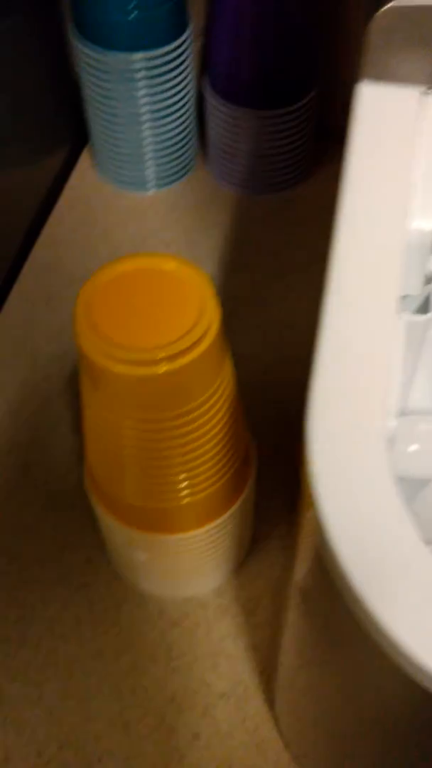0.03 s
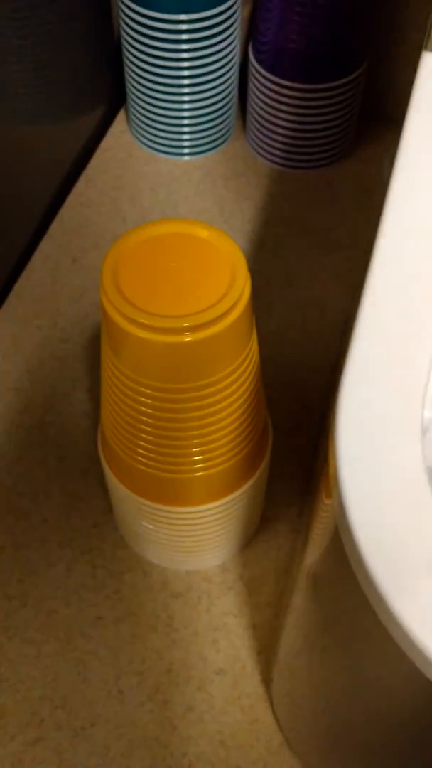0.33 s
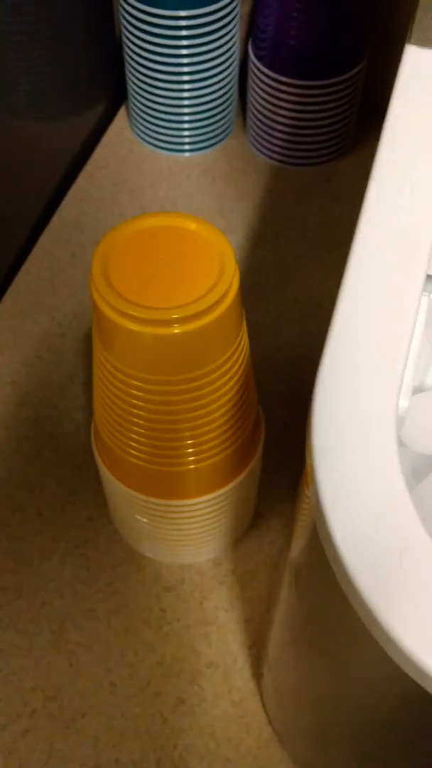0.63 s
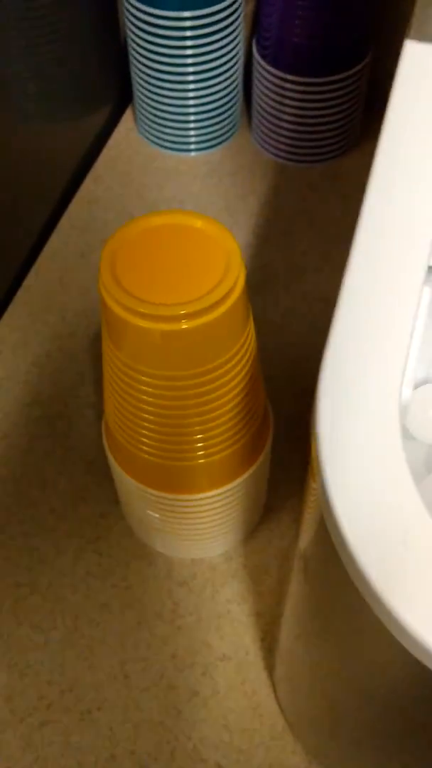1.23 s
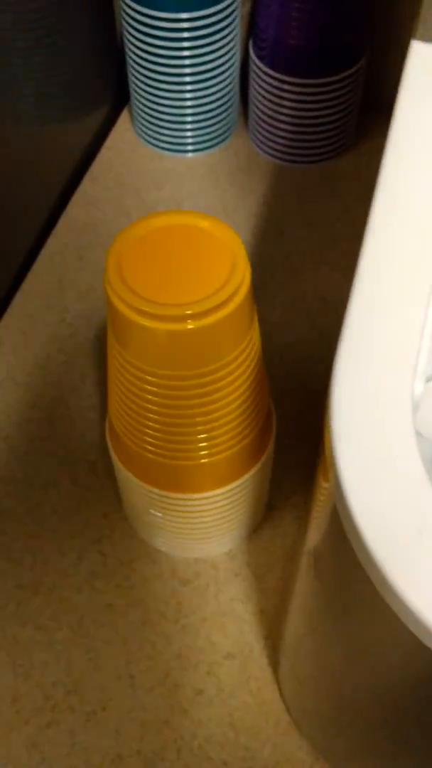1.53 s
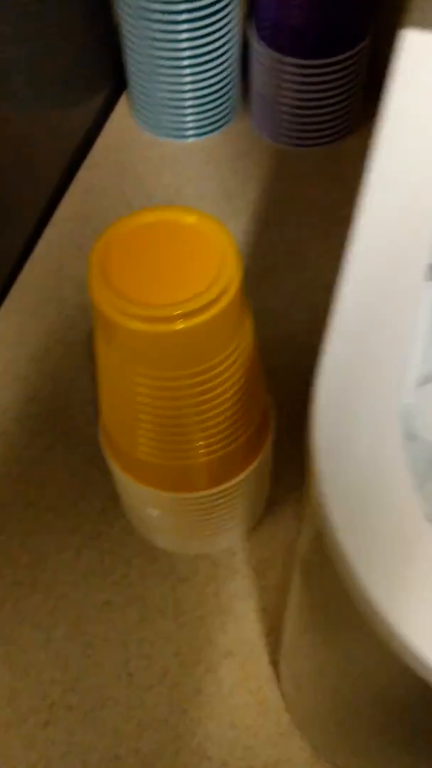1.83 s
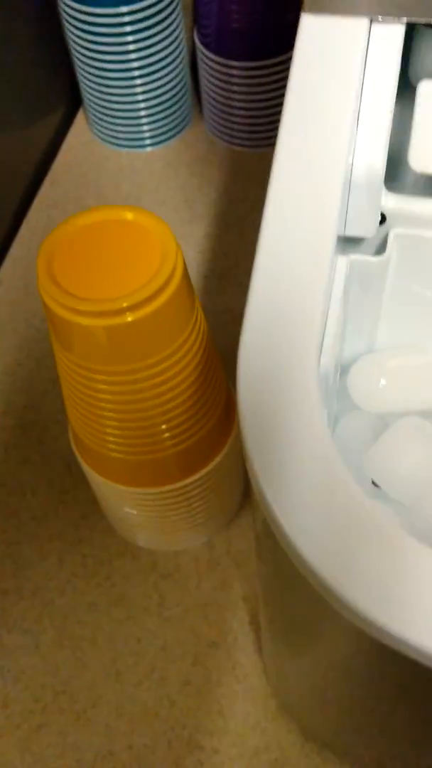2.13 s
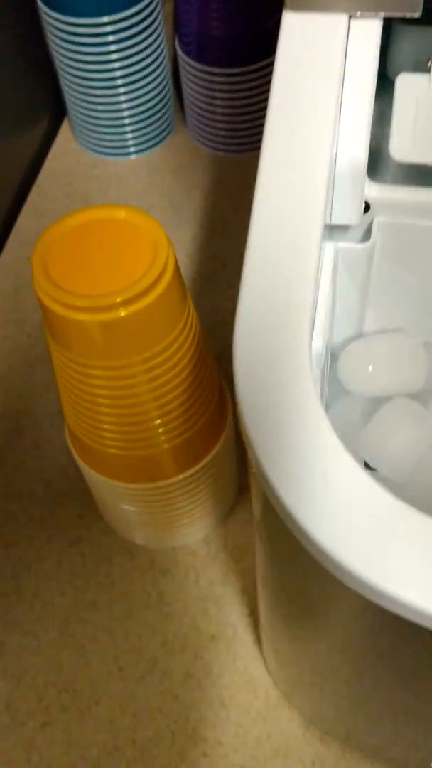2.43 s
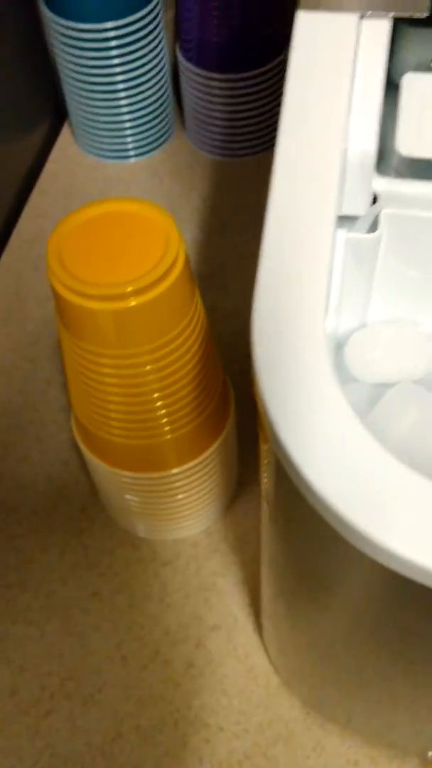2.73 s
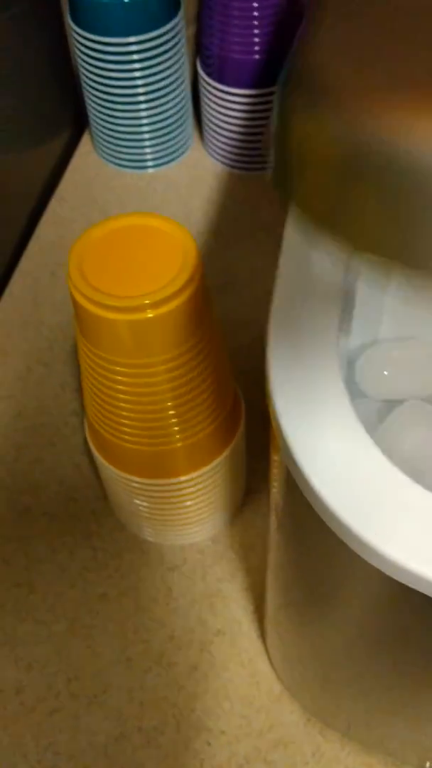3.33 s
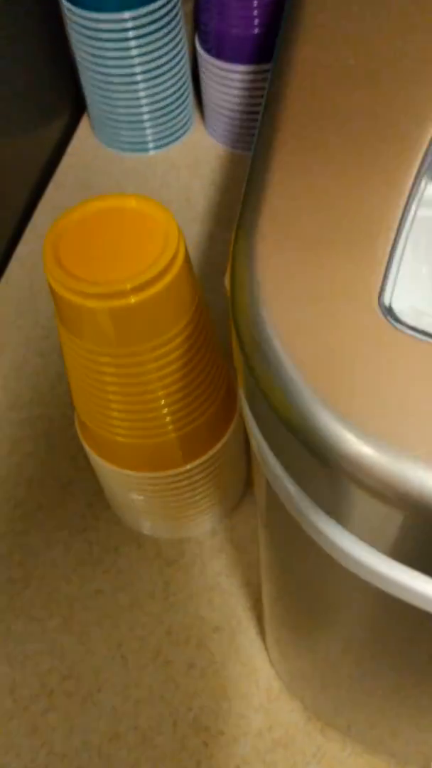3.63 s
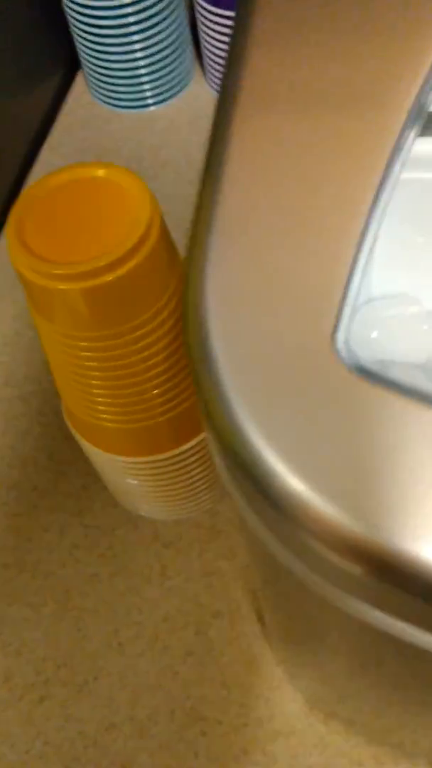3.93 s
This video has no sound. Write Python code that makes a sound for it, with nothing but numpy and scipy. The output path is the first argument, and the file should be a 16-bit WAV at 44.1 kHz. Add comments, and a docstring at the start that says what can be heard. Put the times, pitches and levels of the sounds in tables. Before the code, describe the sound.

Steady ice maker hum and fan whir, with tumbling ice and a lid clapping closed.

```python
"""A small countertop ice maker runs close by: mains hum, a compressor, and a fan with a clear blade tone.
Water drips faintly. For the first second and a half, ice tumbles and clacks in the plastic basket; after
that it ticks as it settles. From about 2 s the lid knocks, is bumped, and knocks again as it swings down.
At 3.5 s it claps shut, muffling the fan's tone and ending the drips.
A limiter turns the hum down after each loud knock and lets it swell back."""
import sys
import numpy as np
from scipy import signal
from scipy.fft import rfft, irfft
from scipy.io import wavfile
from scipy.ndimage import uniform_filter1d

SR = 44100
rng = np.random.default_rng(int(sys.argv[2]) if len(sys.argv) > 2 else 0)


def persist_wave(psi):
    """Save psi, clipped to +-1, as 16-bit WAV."""
    counts = np.round(np.clip(psi, -1, 1) * 32767).astype(np.int16)
    wavfile.write(sys.argv[1], SR, np.atleast_2d(counts).T)


N = 176400
T, HZ = np.arange(N) / SR, np.fft.rfftfreq(N, 1 / SR)

# Levels are relative. A sound fades by 60 dB in its t60, and to about a third in its decay time.
# Compressor hum (multiple of the shaft's turning rate, level/dB)
COMPRESSOR_TONES = [(2, -59), (3, -54.5), (4, -49.5), (6, -43.5), (8, -45), (9, -42.5)]
# Steady whines of the pump and cabinet (f/Hz, level/dB)
PUMP_WHINES = [(422.6, -46), (510, -57), (562.6, -62), (635.2, -43), (710.6, -50), (1322.9, -49),
               (1512, -54.5)]
# Buzz at twice the mains frequency (t/s, level/dB)
BUZZ_LEVEL = [(0, -45), (.2, -41.5), (.6, -45.5), (.95, -42.5), (1.3, -48), (2.5, -48), (2.8, -42),
              (3.15, -54), (3.4, -47), (3.65, -51), (4, -45)]
# Tone of the fan (multiple of the rate at which blades pass, level/dB)
FAN_TONES = [(1, -28.5), (2, -41), (3, -48), (4, -46), (5, -46.5)]
# Rush of the fan's air (f/Hz, level/dB)
AIR_COLOUR = [(20, -95), (60, -71), (160, -69), (300, -56.5), (385, -59.5), (460, -55), (650, -59),
              (770, -68), (920, -61.5), (1030, -71), (1200, -65), (1480, -71.5), (1800, -70.5),
              (2300, -81.5), (3500, -79), (4400, -86.5), (5600, -89.5), (10000, -100), (15500, -100)]
# Loudness of the machine as the microphone moves about (t/s, level/dB)
MACHINE_LEVEL = [(0, 0), (.2, -1.5), (.42, 0), (.6, -5.5), (1.0, -4), (1.4, -6.5), (1.6, -4), (1.85, -1.5),
                 (2.1, 0.5), (2.6, 0.5), (2.8, 1.5), (3.1, 0), (3.45, -1.5), (4, -1.5)]
# Ticks of settling ice (t/s, level/dB, f/Hz, decay/s)
ICE_TICKS = [(.066, -50, 13500, 0.0054), (1.022, -26.5, 770, 0.01), (1.274, -28, 970, 0.004),
             (1.347, -27.5, 3330, 0.004), (1.594, -37, 1440, .006), (1.67, -37.5, 3260, 0.0057),
             (1.548, -50, 7900, 0.0028), (1.689, -49.5, 7600, 0.0036), (1.767, -43.5, 6100, 0.0033),
             (1.825, -49, 12000, .003), (1.991, -43.5, 5300, 0.0044), (2.107, -34, 5400, 0.0059),
             (2.13, -43.5, 9400, 0.0065), (2.151, -47, 7600, 0.0052), (2.262, -30.5, 2860, 0.007),
             (2.39, -45, 13000, 0.0032), (2.504, -57, 14300, .004), (2.432, -30, 1730, 0.0068),
             (2.988, -32, 2980, 0.0077), (3.076, -34.5, 7900, 0.005), (3.107, -42.5, 6400, 0.0044),
             (3.253, -37.5, 3450, 0.006), (3.395, -38.5, 11300, 0.0034), (3.397, -43.5, 3440, 0.012),
             (3.689, -30, 1300, 0.0069), (3.83, -38.5, 3100, 0.0053)]
# Ice pieces tumbling against each other (t/s, level/dB, decay/s, treble/dB)
TUMBLES = [(.098, -32, .018, -2), (0.1154, -27.5, 0.009, 4), (0.1638, -32, 0.013, 4),
           (0.231, -33, 0.036, -4), (0.255, -35.5, 0.032, 2), (0.364, -29.5, 0.028, -3.5),
           (0.427, -35.5, 0.039, 8.5), (.456, -18.5, 0.016, 1), (0.468, -20.5, 0.017, 4),
           (0.515, -24.5, 0.02, 0), (0.548, -25.5, .012, 1), (.59, -32, 0.027, 1),
           (0.608, -30.5, 0.028, -4), (0.763, -32.5, 0.014, 7.5), (0.786, -34.5, 0.026, 0),
           (0.8293, -34.5, 0.012, 5), (0.843, -32.5, 0.012, 4), (0.9605, -28.5, 0.011, 0),
           (0.98, -25, 0.009, 3), (0.999, -23, 0.014, -2), (1.185, -29.5, 0.028, -5),
           (1.2019, -24.5, 0.0095, 3), (1.273, -37, 0.012, -13), (1.34, -27.5, 0.0064, 12),
           (1.346, -24.5, 0.0097, -15), (1.385, -35, 0.0065, 8.5), (1.401, -39, 0.0053, 9),
           (1.516, -39, 0.016, 7)]
# Ice shifting between tumbles (t/s, level/dB)
SHIFTING_LEVEL = [(0, -75), (.14, -33.5), (.32, -56), (.42, -33), (.5, -28.5), (.63, -33), (.72, -38.5),
                  (.8, -41), (.91, -47), (1.04, -60), (1.12, -42), (1.24, -38), (1.45, -84), (1.7, -57),
                  (4, -86)]
# Tone colour of ice in the basket (f/Hz, level/dB)
ICE_COLOUR = [(30, -36), (85, -11), (120, -2), (165, -11), (240, 5), (450, -6.5), (720, -1.5), (900, 3),
              (1250, -5), (1700, 4.5), (2100, -1.5), (2700, -5), (3700, -5), (4500, -8.5), (5500, -14),
              (7500, -21), (10000, -29), (15500, -30.5)]
# Single pieces striking the basket (t/s, crack level/dB, treble/dB, ring level/dB)
BASKET_HITS = [(0.099, -31, -4, -26), (.1152, -17, 0, -26), (.1645, -26.5, 4, -34), (.4570, -17, -2, -25.5),
               (.4712, -21, -4, -22), (.5492, -27, 4, -23), (.7667, -26, 0, -38), (.844, -23, 0, -36),
               (0.9628, -20.5, -4, -33), (.9787, -23.5, 2, -32), (0.9981, -18, 2, -19),
               (1.2025, -15, 2.5, -25), (1.3405, -23, 3, -29), (1.3462, -18, 5, -23)]
# Tone colour of the crack of such a hit (f/Hz, level/dB)
CRACK_COLOUR = [(60, -8), (600, -2.5), (1700, 1), (2500, 0.5), (3600, 0), (5500, -3), (8000, -15.5),
                (11000, -21.5), (15500, -18.5)]
# Hollow ringing of the basket (f/Hz, level/dB, t60/s)
BASKET_MODES = [(732, -7, 0.052), (915, -1.5, 0.062), (1150, -14, 0.027), (1580, 1, 0.059),
                (3170, -6, 0.044)]
# Boom of the bumped cabinet; low notes tend to start later (f/Hz, level/dB, t60/s, delay/s)
CABINET_MODES = [(74, -7.5, 0.17, 0.013), (127.5, 3.5, .10, 0.0117), (195, -5, 0.13, 0.0071),
                 (236.6, 7, 0.047, 0.00432), (516, -8.5, 0.068, 0.0016), (984, 1.5, 0.037, 0.00138),
                 (1383, -4, 0.055, 0.0033)]
# Knocks of the lid (t/s, level/dB, f/Hz, t60/s, click/dB, shell overtones/dB)
LID_KNOCKS = [(1.945, -17.5, 1260, 0.045, -30, -7), (2.022, -8.5, 1086, 0.034, -16, -9),
              (2.825, -8.5, 778, 0.044, -25, -15), (2.9474, 6, 886, 0.026, -28, -6),
              (2.954, 6.5, 880, 0.039, -20.5, -2), (2.998, 0.5, 835, 0.034, -22, 2),
              (3.40, -20.5, 815, 0.11, -38, -8.5), (3.508, -19.5, 1144, 0.1, -45, -14),
              (3.5226, -1, 1110, 0.042, -22, -6), (3.5384, 17, 1105, 0.02, -21, -7),
              (3.611, -8.5, 817, 0.064, -20, -1), (3.628, -9.5, 900, 0.029, -16, -1),
              (3.733, -11.5, 590, 0.014, -33, -4)]
# Ringing of the lid (multiple of the knock's pitch, level/dB, multiple of its t60)
LID_MODES = [(1, 0, 0.97), (1.07, -13, 1.3), (.78, -17, 0.55)]
# Overtones of the lid's shell, at the same pitches in every knock (f/Hz, level/dB, t60/s)
SHELL_MODES = [(1632, -18.5, 0.038), (1807, -21.5, 0.04), (2860, -28.5, .035)]
# Tone colour of the lid's click (f/Hz, level/dB)
CLICK_COLOUR = [(60, -14), (500, 9), (1350, 9.5), (2250, -11), (3400, -10.5), (4600, -16.5), (7500, -13.5),
                (10000, -30.5), (15500, -21)]
# How long the kitchen echoes (f/Hz, t60/s)
KITCHEN_T60 = [(100, 0.37), (1000, 0.38), (4000, 0.31), (15000, 0.12)]
# The microphone's two openings (f/Hz, left minus right/dB, likeness from 0 to 1, left lead/rad)
MIC_PORTS = [(30, -7, 1, 0.56), (60, 14, 0.68, 0.68), (131, 6, 0.99, 0.43), (330, 3.5, 1, 0.96),
             (550, -0.5, 0.87, 0.62), (1040, -1, 0.93, -0.049), (2220, -1.5, 1, -0.2),
             (4000, -.5, 0.88, -0.3), (15000, -0.5, 1, -0.42)]

SHUT_S = 3.54  # the lid closes
ICE_RISE_S, ROOM_ICE_DB, ROOM_LID_DB = 0.001, -17, -20


def amp(db):
    """Turns decibels into a gain."""
    return 10 ** (np.asarray(db) / 20)


def unit(x):
    """Scales a sound to an average (rms) size of 1."""
    return x / np.sqrt(np.mean(x ** 2) + 1e-20)


def spectrum(points, hz, column=1):
    """Reads one column of a table on a log-frequency axis."""
    table = np.transpose(points)
    return np.interp(np.log(hz + 1), np.log(table[0] + 1), table[column])


def level(points):
    """Turns a dB curve over time into a gain."""
    return amp(np.interp(T, *np.transpose(points)))


def add(mix, s, sound):
    """Mixes a sound in at s seconds."""
    part = mix[round(s * SR):][:len(sound)]
    part += sound[:len(part)]


def wander(rate_hz):
    """A random wobble, mostly slower than rate_hz."""
    return unit(irfft(rfft(rng.standard_normal(N)) / (1 + (HZ / rate_hz) ** 4), N))


def colour(x, points):
    """Gives a sound a tone colour, with a filter that rings only after each hit."""
    log_gain = np.log(amp(spectrum(points, abs(np.fft.fftfreq(4096, 1 / SR)))))
    taps = np.fft.ifft(np.exp(np.conj(signal.hilbert(log_gain)))).real[:2048]
    return signal.oaconvolve(x, taps / np.linalg.norm(taps))[:N]


def mode(t, hz, t60, rise_s):
    """One note of a struck object: it starts softly and dies away."""
    return np.sin(2 * np.pi * hz * t) * (1 - np.exp(-t / rise_s)) * np.exp(-np.log(1000) * t / t60)


def tone(turns, db):
    """A steady tone that flutters in level; turns counts its cycles."""
    return np.sqrt(2) * amp(db) * np.cos(2 * np.pi * turns) * (1 + 0.22 * wander(rate_hz=25))


def stereo(x, other=None, aside=True):
    """Places a sound at the microphone; from the side, its treble reaches the right opening first."""
    delay_s, treble_hz = .000444, 1100
    tilt, likeness, lead = (spectrum(MIC_PORTS, HZ, column=k) for k in (1, 2, 3))
    lead = lead - aside * 2 * np.pi * delay_s * np.maximum(HZ - treble_hz, 0)
    left = right = rfft(x)
    if other is not None:  # a second sound makes the two sides less alike
        right = likeness * left + np.sqrt(1 - likeness ** 2) * rfft(other)
    return irfft(np.array([left * amp(tilt / 2) * np.exp(1j * lead), right * amp(-tilt / 2)]), N)


def kitchen(x):
    """The room's wash of echoes, each pitch dying at its own speed."""
    hz, t, bands = signal.stft(rng.standard_normal((2, SR // 2)), SR, nperseg=256)
    fade = amp(-60 * t / spectrum(KITCHEN_T60, hz)[:, None]) * np.minimum(t / .008, 1)
    tail = signal.istft(bands * fade, SR, nperseg=256)[1]
    return stereo(*signal.fftconvolve(x[None], tail / np.linalg.norm(tail[0]), axes=1)[:, :N])


def air():
    """The fan's air rushes: noise with faint, drifting louder and softer patches."""
    bands = signal.stft(rng.standard_normal(N), nperseg=1024)[2]
    patches = uniform_filter1d(rng.standard_normal(bands.shape), size=10, axis=0)
    patch_db = 1.5 * unit(uniform_filter1d(patches, size=5, axis=1))
    noise = signal.istft(bands * amp(patch_db), nperseg=1024)[1][:N]
    return irfft(rfft(noise) * amp(spectrum(AIR_COLOUR, HZ) - 2), N) * np.sqrt(SR / 2)


def fan(blade_hz=325.7, muffle_db=-11.5):
    """Passing blades make a tone; the shut lid muffles it, its overtones far less."""
    shut = np.clip((T - SHUT_S) / .01, 0, 1)
    turns = np.cumsum(blade_hz + 0.44 * wander(rate_hz=4.5)) / SR
    return sum(tone(k * turns, db) * amp(muffle_db * shut / k ** 2) for k, db in FAN_TONES)


def machine(mains_hz=60, shaft_hz=58.6):
    """Mains hum throbs against the slightly slower compressor, along with the whines and the fan."""
    t = T - .43  # mains and compressor are in step when this is zero
    buzz = level(BUZZ_LEVEL) * tone(2 * mains_hz * t, db=-2.1)
    hum = np.sqrt(2) * amp(-43.5) * np.cos(2 * np.pi * mains_hz * t)
    hum += sum(tone(k * shaft_hz * t, db) for k, db in COMPRESSOR_TONES)
    hum += sum(tone(np.cumsum(hz + 0.88 * wander(rate_hz=5.6)) / SR, db) for hz, db in PUMP_WHINES)
    return stereo(buzz) + level(MACHINE_LEVEL) * (stereo(hum + fan()) + stereo(air(), air()))


def basket(x, echo_db=0.5, decay_s=0.0029):
    """Quick echoes between the basket's walls thicken each contact."""
    t = T[:SR // 40]
    echoes = rng.standard_normal(len(t)) * np.exp(-t / decay_s)
    echoed = signal.oaconvolve(x, echoes / np.linalg.norm(echoes))[:N]
    return (x + amp(echo_db) * echoed) / np.hypot(1, amp(echo_db))


def drips(count=400, per_s=60, low_hz=1300, high_hz=14000):
    """Water trickles over the ice in faint random pings, weaker when higher, until the lid shuts."""
    pings, t = np.zeros(N), T[:SR // 20]
    for when, height, chance in rng.random((count, 3)):
        s = when * count / per_s
        octaves = height * np.log2(high_hz / low_hz)
        db = -52 - 6.5 * octaves + 5 * min(-np.log(chance), 3)
        if s < SHUT_S:
            add(pings, s, amp(db) * mode(t, low_hz * 2 ** octaves, t60=0.01, rise_s=ICE_RISE_S / 2))
    return stereo(basket(pings), aside=False) + amp(ROOM_ICE_DB) * kitchen(pings)


def ticks(crackle_hz=3500):
    """Settling ice ticks; above crackle_hz the ticks spread in pitch and become crackles."""
    out, t = np.zeros(N), T[:SR // 10]
    octaves = np.log2(np.fft.rfftfreq(len(t), 1 / SR) + 1)
    for s, db, hz, decay in ICE_TICKS:
        width_octaves = 0.12 * max(1, hz / crackle_hz) ** 1.6
        band = 1 / (1 + ((octaves - np.log2(hz)) / width_octaves) ** 2)
        ring = unit(irfft(rfft(rng.standard_normal(len(t))) * band))
        add(out, s, amp(db + 2) * ring * (1 - np.exp(-t / ICE_RISE_S)) * np.exp(-t / decay))
    return stereo(out, aside=False) + amp(ROOM_ICE_DB) * kitchen(out)


def clinks(low_hz=714, high_hz=4174):
    """Every tumble sets three pieces of ice ringing, each at its own pitch."""
    out, t = np.zeros(N), T[:SR // 8]
    for (s, db, decay, _), pieces in zip(TUMBLES, rng.random((len(TUMBLES), 3, 2))):
        for when, height in pieces:
            hz = low_hz * (high_hz / low_hz) ** height
            add(out, s + when * decay, amp(db - 5.5) * mode(t, hz, t60=0.074, rise_s=ICE_RISE_S / 2))
    return stereo(out) + amp(ROOM_ICE_DB) * kitchen(out)


def ice_contacts(per_s=2200, spread_db=4.5):
    """Pieces of ice touch in a dense stream of tiny taps of uneven size."""
    size = amp(spread_db * np.minimum(rng.exponential(1, N), 3))
    return unit(size * rng.choice([-1., 1.], N) * (rng.random(N) < per_s / SR))


def tumbling_ice(treble_hz=4500):
    """Each tumble is a burst of tiny contacts that ring the plastic basket."""
    t = T[:SR // 4]
    low_power = level(SHIFTING_LEVEL) ** 2
    treble_power = low_power.copy()
    for s, db, decay, treble_db in TUMBLES:
        burst = amp(db + 6) * (1 - np.exp(-t / ICE_RISE_S)) * np.exp(-t / decay)
        add(low_power, s, burst ** 2)
        add(treble_power, s, (burst * amp(treble_db)) ** 2)
    rattles = []
    for contacts in (ice_contacts(), ice_contacts()):  # two streams give stereo width
        low = irfft(rfft(contacts) / (1 + (HZ / treble_hz) ** 4), N)
        taps = low * np.sqrt(low_power) + (contacts - low) * np.sqrt(treble_power)
        rattles.append(colour(basket(taps), ICE_COLOUR))
    return stereo(*rattles) + amp(ROOM_ICE_DB) * kitchen(rattles[0])


def clacks(treble_hz=5000, crack_s=.0018, detune=0.073):
    """A piece hits the basket: a crack, then the plastic's hollow ring, tuned a little anew each hit."""
    cracks, rings, t = np.zeros(N), np.zeros(N), T[:SR // 10]
    lows = 1 / (1 + (np.fft.rfftfreq(len(t), 1 / SR) / treble_hz) ** 4)
    hit_shifts = detune * rng.uniform(-1.08, 1, (len(BASKET_HITS), len(BASKET_MODES)))
    for (s, db, treble_db, ring_db), shifts in zip(BASKET_HITS, hit_shifts):
        noise = irfft(rfft(rng.standard_normal(len(t))) * (lows + amp(treble_db) * (1 - lows)))
        add(cracks, s, amp(db) * noise * np.exp(-t / crack_s))
        for (hz, mode_db, t60), shift in zip(BASKET_MODES, shifts):
            add(rings, s, amp(ring_db + mode_db) * mode(t, hz * (1 + shift), t60, rise_s=.0007))
    direct = colour(cracks, CRACK_COLOUR) + rings
    return stereo(direct) + amp(ROOM_ICE_DB) * kitchen(direct)


def bump(at_s=2.629, crack_s=0.0037, rattle_s=0.024):
    """A bump booms through the cabinet and jolts the ice, which rattles on briefly."""
    boom, jolt, t = np.zeros(N), np.zeros(N), T[:SR // 3]
    for hz, db, t60, delay in CABINET_MODES:
        add(boom, at_s + delay, amp(db) * mode(t, hz, t60, rise_s=0.0063))
    fade = t / crack_s * np.exp(-t / crack_s) + amp(-20) * np.exp(-t / rattle_s)
    add(jolt, at_s, amp(-6.5) * rng.standard_normal(len(t)) * fade)
    jolt = irfft(rfft(jolt) / np.hypot(1, HZ / 30000), N)  # slightly duller
    return boom, colour(jolt, ICE_COLOUR)


def knocks(rise_s=0.0023, click_s=0.0015, buzz_s=0.011):
    """Each knock of the lid is a click with a brief buzz, and a short hollow ring."""
    rings, clicks, t = np.zeros(N), np.zeros(N), T[:SR // 3]
    shell = sum(amp(db) * mode(t, hz, t60, rise_s) for hz, db, t60 in SHELL_MODES)
    click_fade = np.exp(-t / click_s) + amp(-7.5) * np.exp(-t / buzz_s)
    for s, db, hz, t60, click_db, shell_db in LID_KNOCKS:
        hollow = sum(amp(mode_db) * mode(t, hz * ratio, t60 * share, rise_s)
                     for ratio, mode_db, share in LID_MODES)
        add(rings, s, amp(db) * (hollow + amp(shell_db) * shell))
        add(clicks, s, amp(db + click_db) * rng.standard_normal(len(t)) * click_fade)
    return rings + colour(clicks, CLICK_COLOUR)


def lid():
    """The bump and the lid's knocks sound out into the kitchen."""
    boom, jolt = bump()
    direct = boom + knocks()
    return stereo(direct, aside=False) + stereo(jolt) + amp(ROOM_LID_DB) * kitchen(direct + jolt)


def scene():
    """The machine, the ice, the water and the lid together."""
    return machine() + tumbling_ice() + clacks() + clinks() + ticks() + drips() + lid()


def record(dry):
    """A limiter turns loud moments down fast and recovers slowly; the highest treble is cut."""
    limit_db, recover_db_per_s, top_hz = -6, 12.5, 15900
    over_db = np.maximum(20 * np.log10(abs(dry).max(0) + 1e-9) - limit_db, 0)
    recovery = recover_db_per_s * T
    duck_db = np.maximum.accumulate(over_db + recovery) - recovery
    limited = dry * amp(-uniform_filter1d(duck_db, size=110))
    rounded = limited / (1 + limited ** 8) ** .125  # soft overload rounds off the peaks
    treble_cut = signal.firwin(255, top_hz, window=("kaiser", 9), fs=SR)
    return signal.oaconvolve(rounded, treble_cut[None], "same")


dry = scene()
out = record(dry)
persist_wave(out)
```